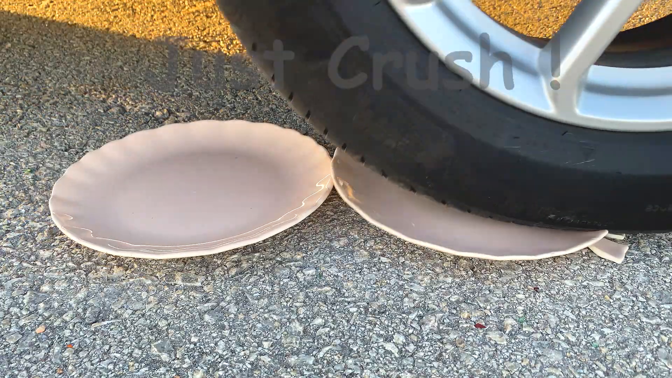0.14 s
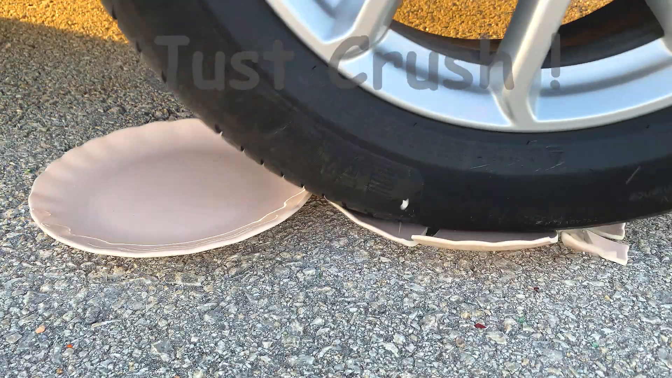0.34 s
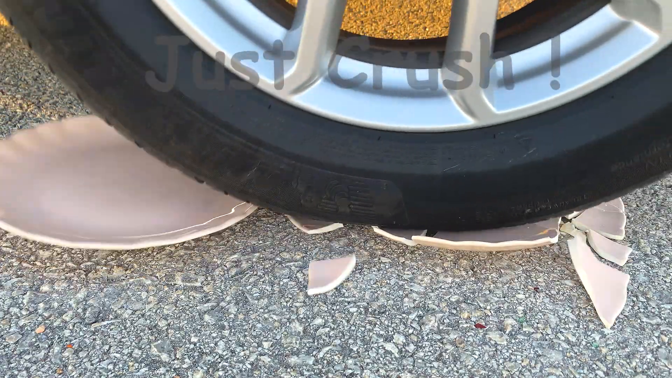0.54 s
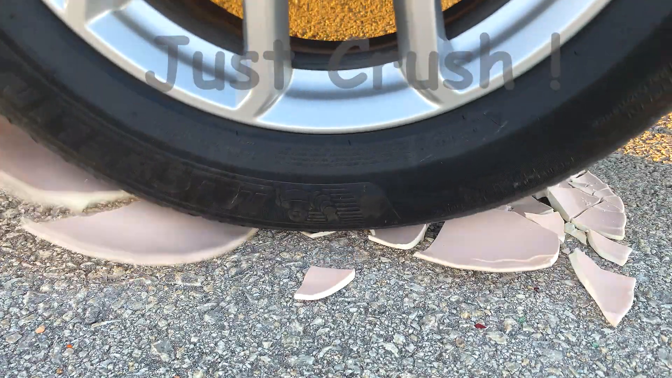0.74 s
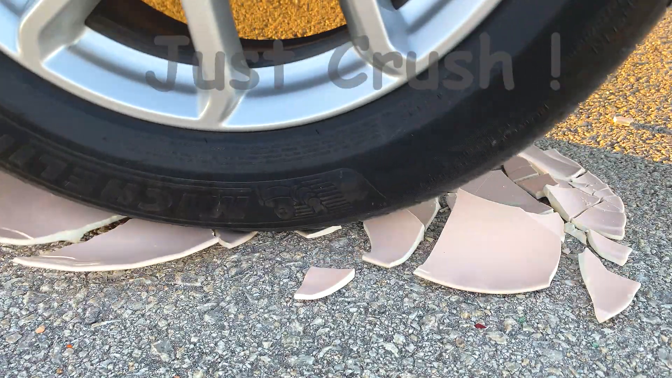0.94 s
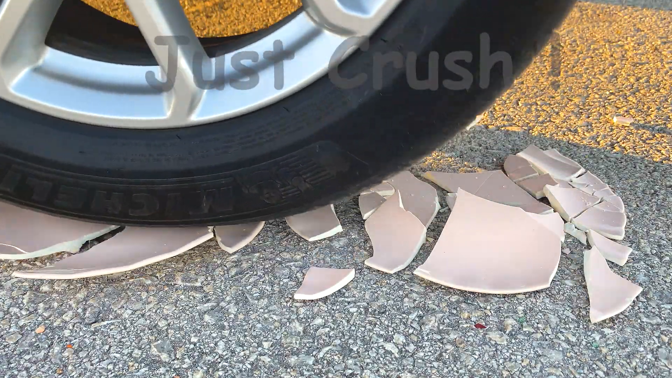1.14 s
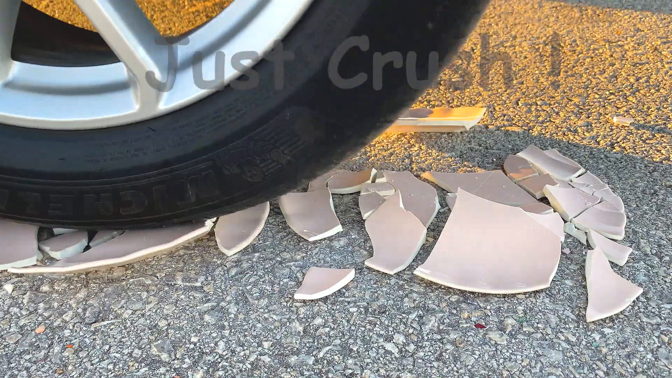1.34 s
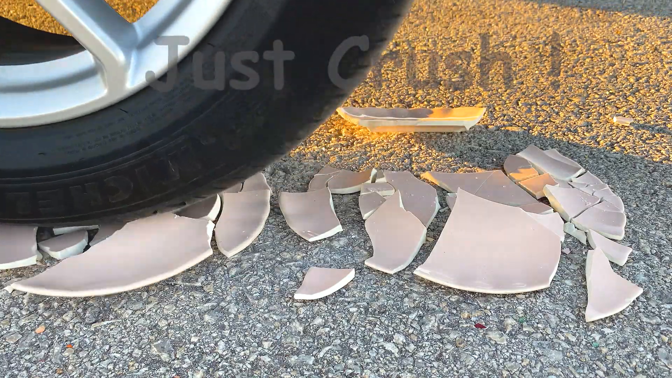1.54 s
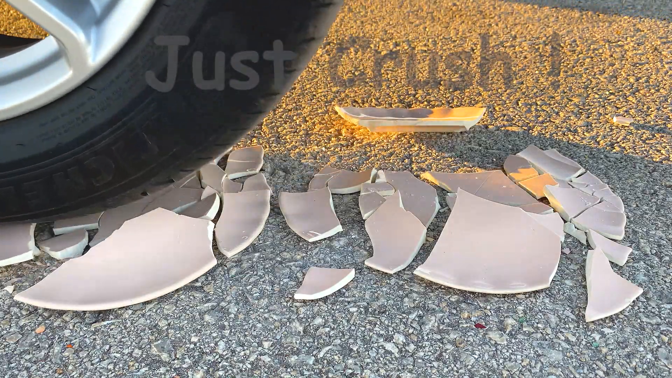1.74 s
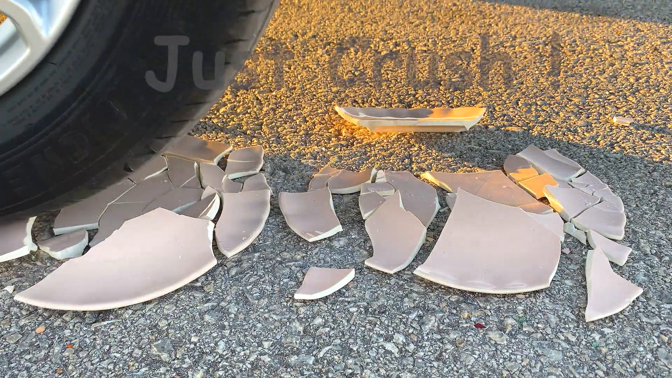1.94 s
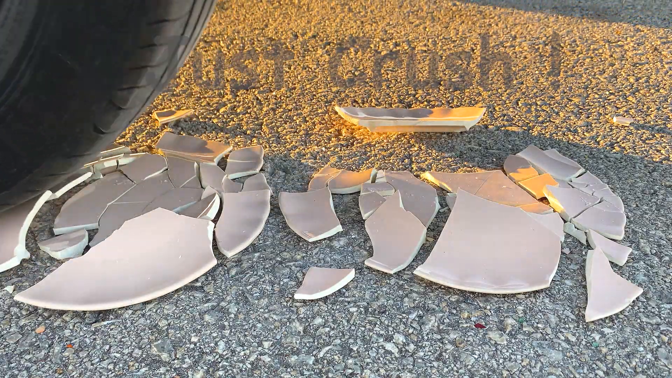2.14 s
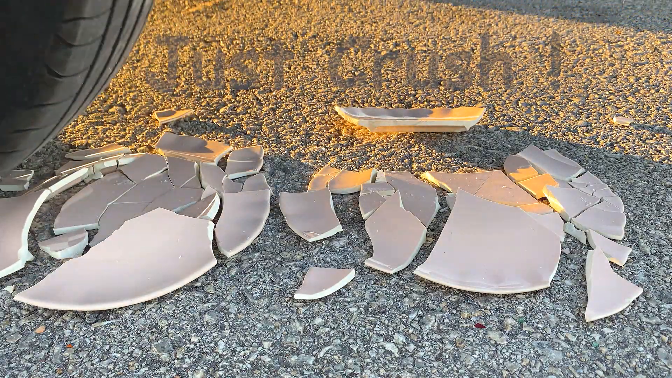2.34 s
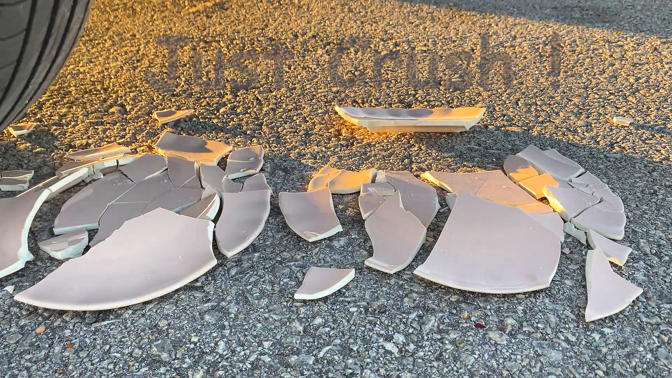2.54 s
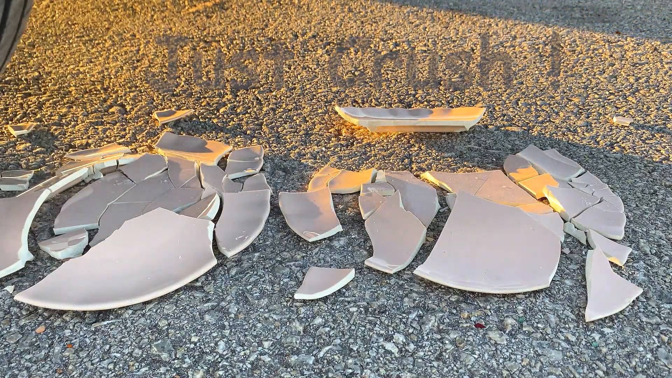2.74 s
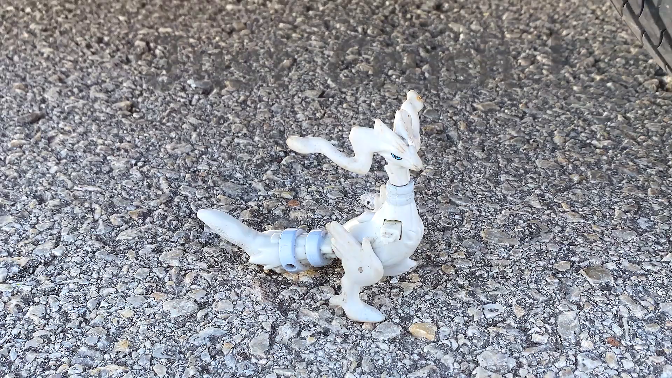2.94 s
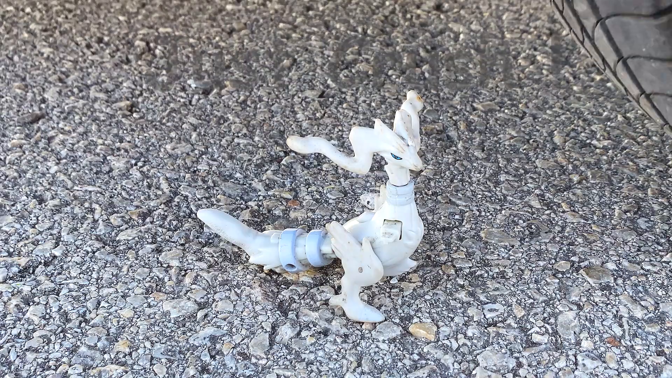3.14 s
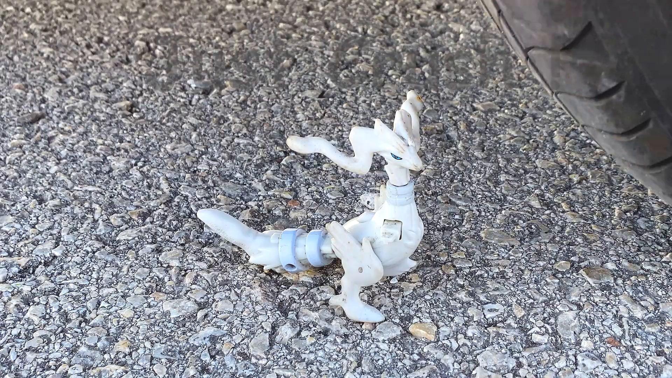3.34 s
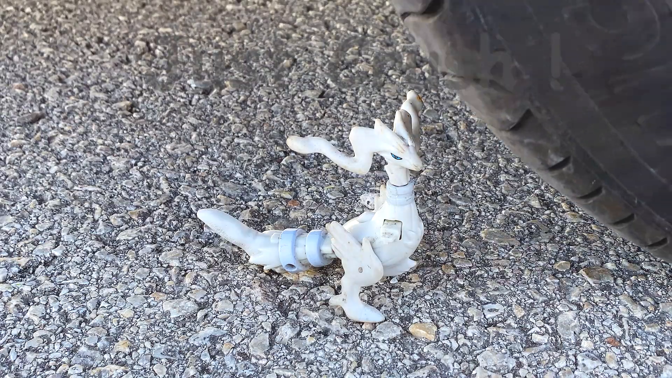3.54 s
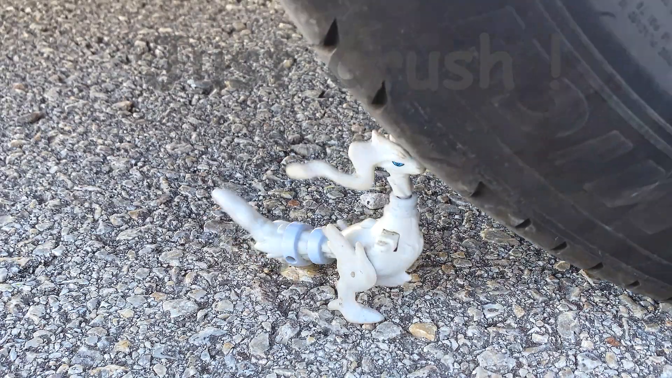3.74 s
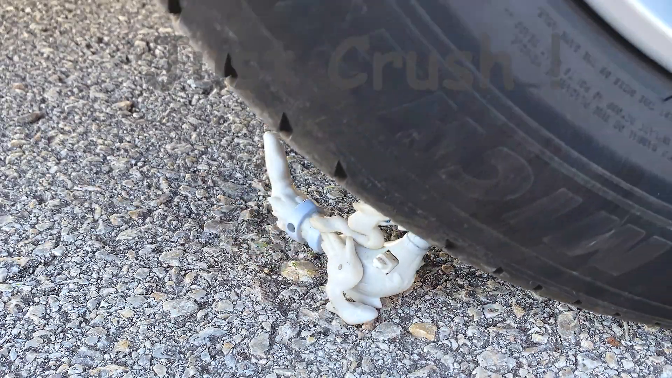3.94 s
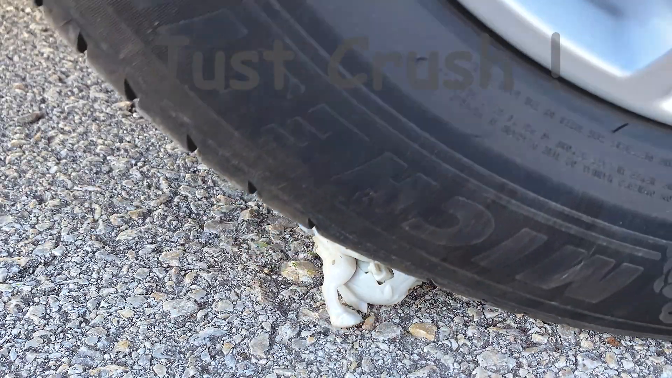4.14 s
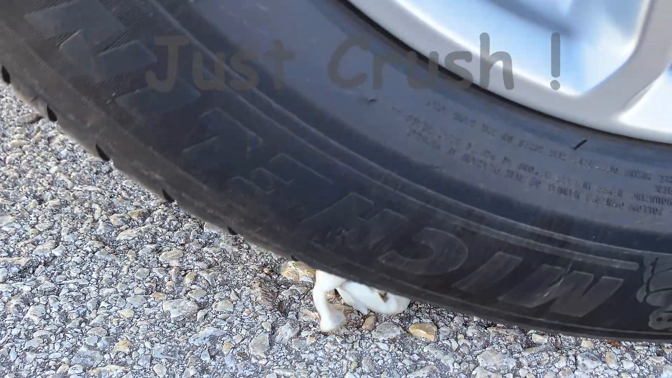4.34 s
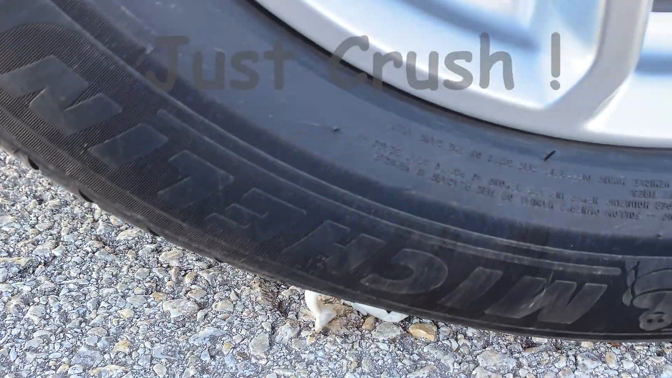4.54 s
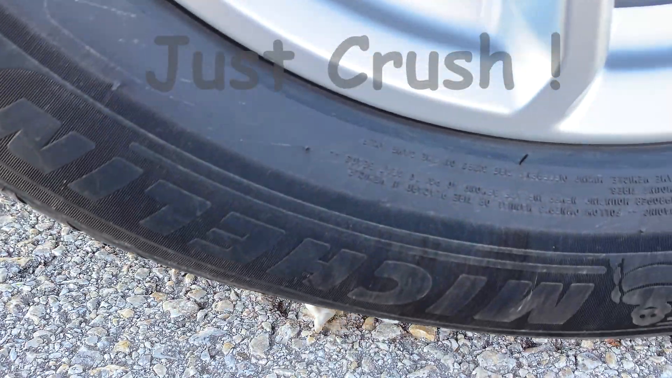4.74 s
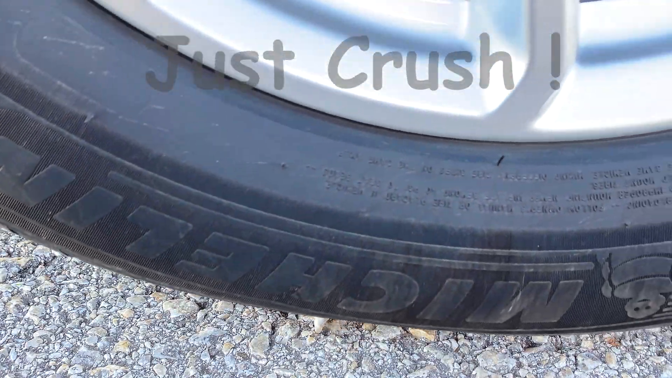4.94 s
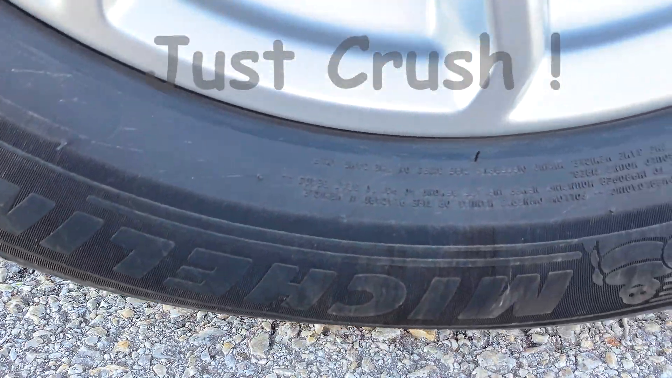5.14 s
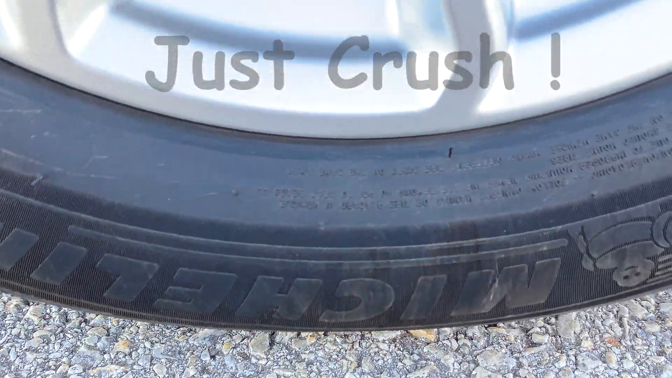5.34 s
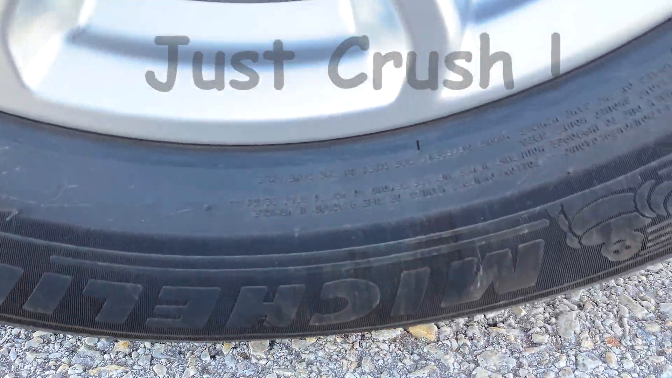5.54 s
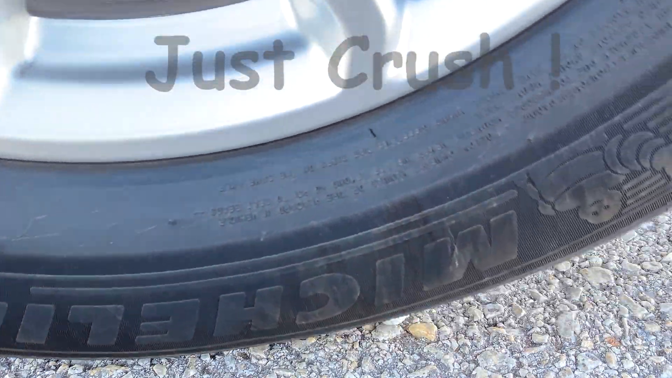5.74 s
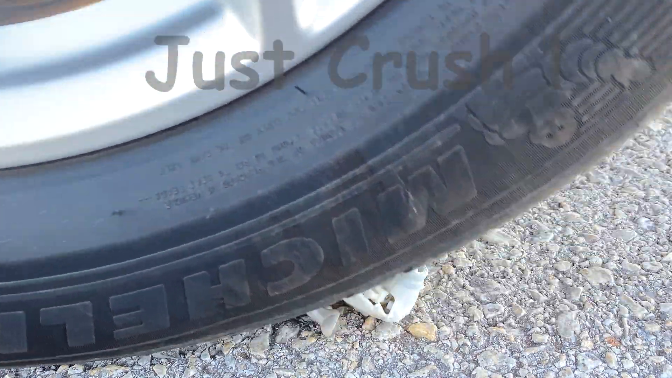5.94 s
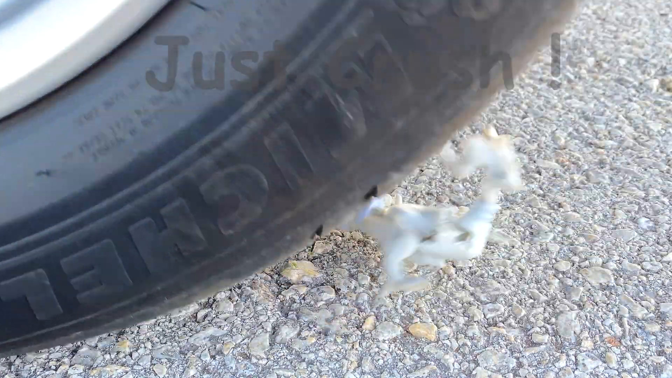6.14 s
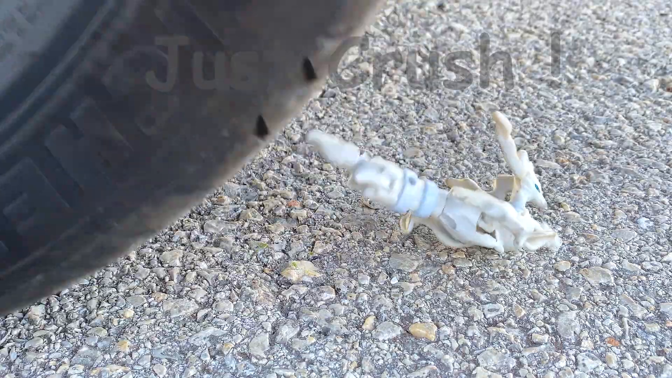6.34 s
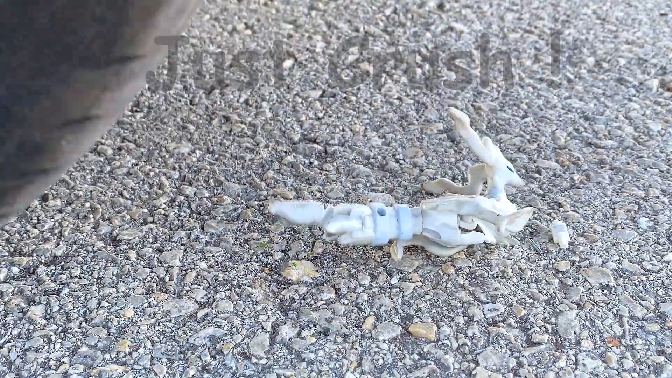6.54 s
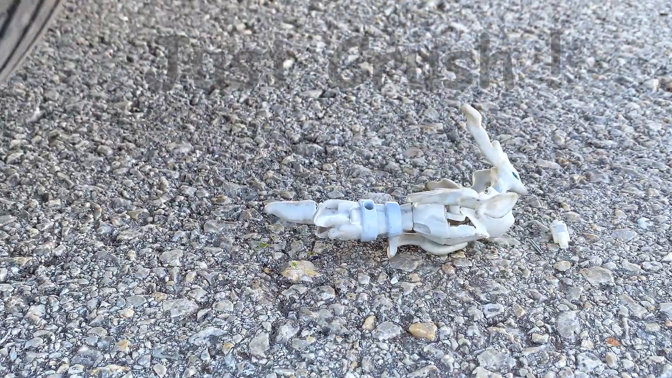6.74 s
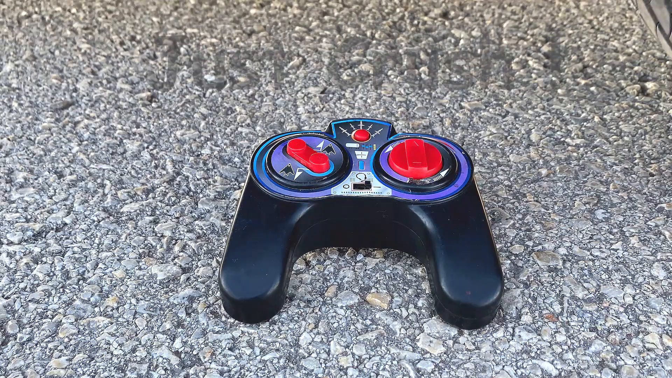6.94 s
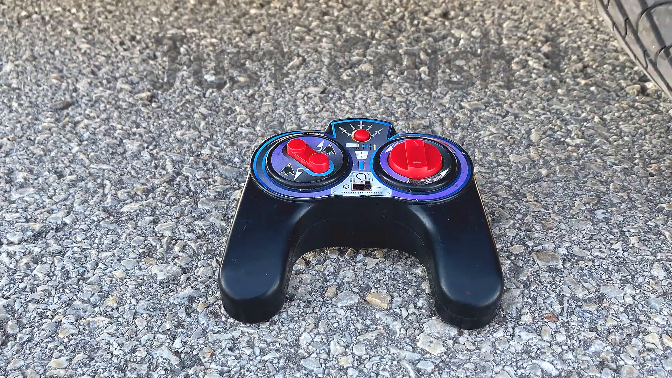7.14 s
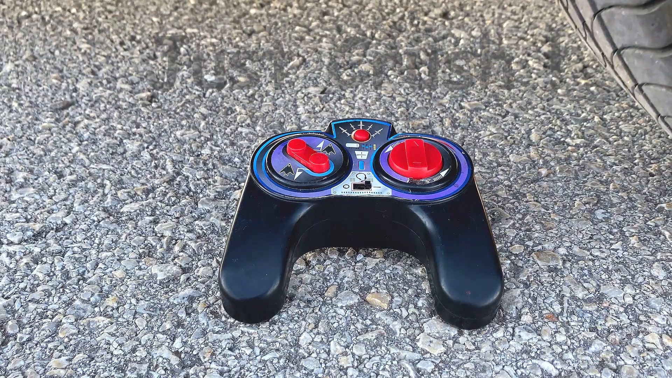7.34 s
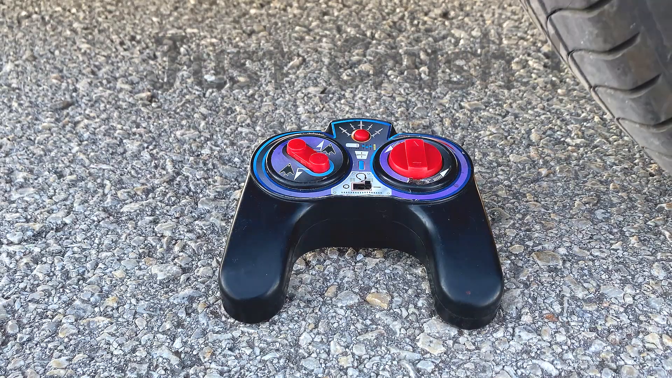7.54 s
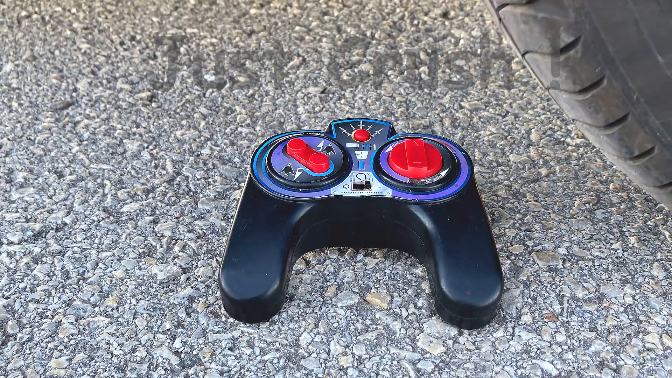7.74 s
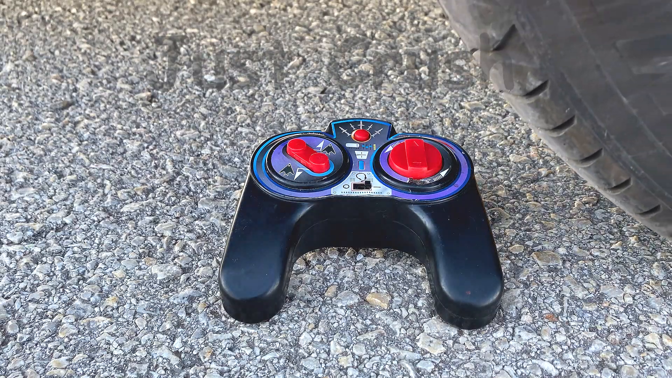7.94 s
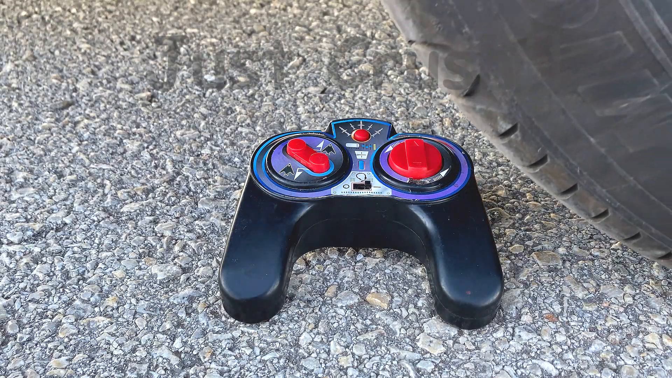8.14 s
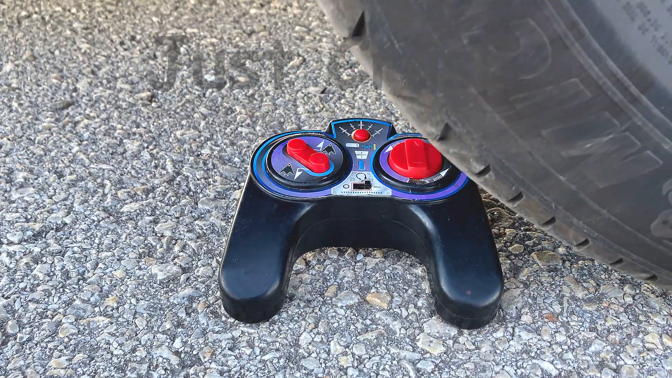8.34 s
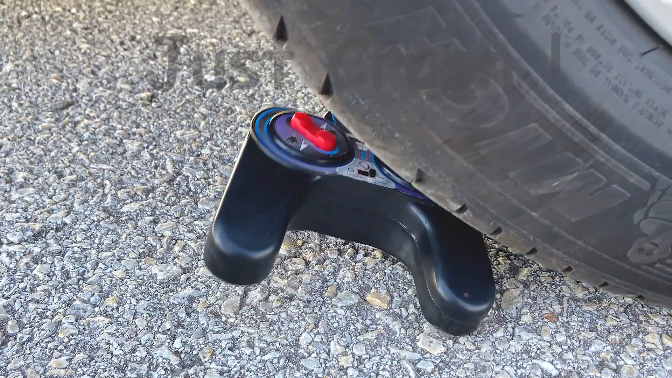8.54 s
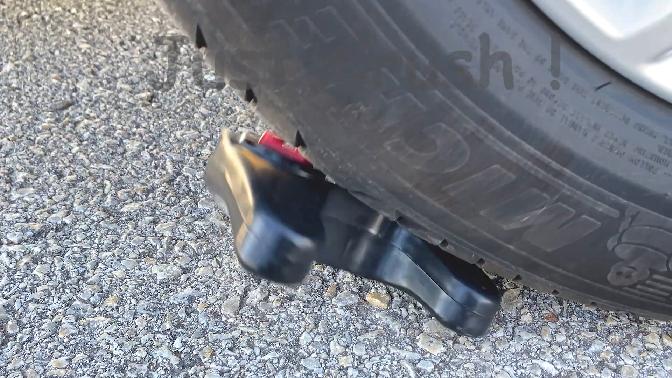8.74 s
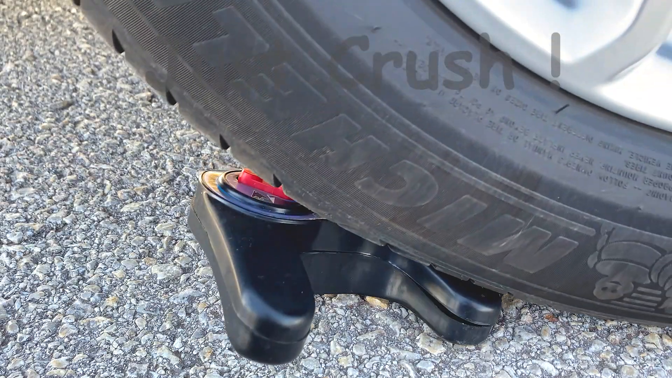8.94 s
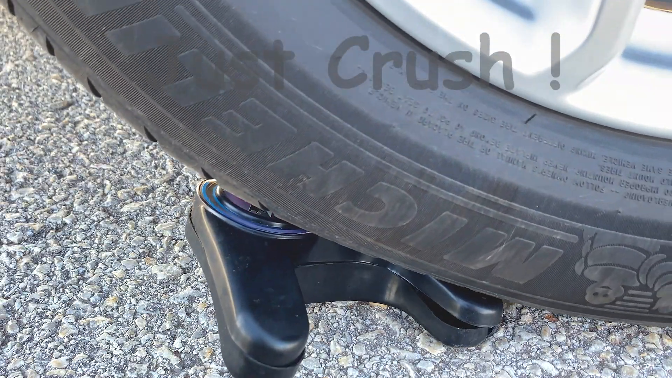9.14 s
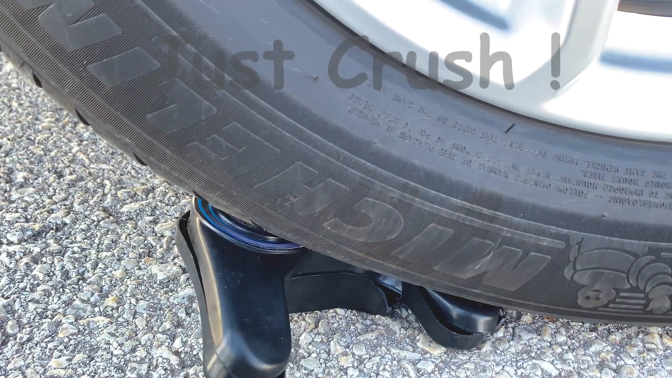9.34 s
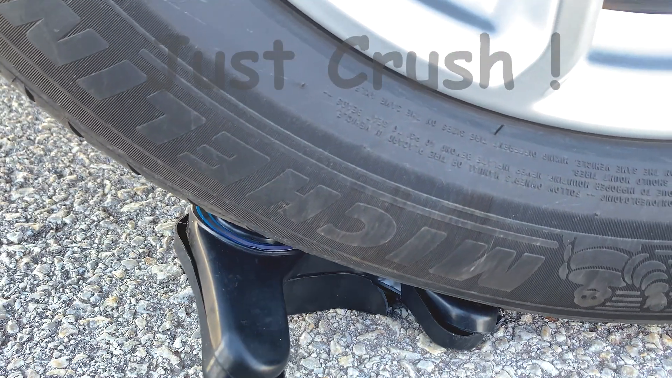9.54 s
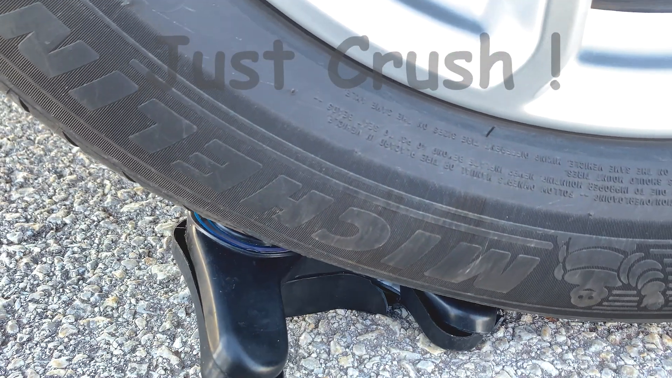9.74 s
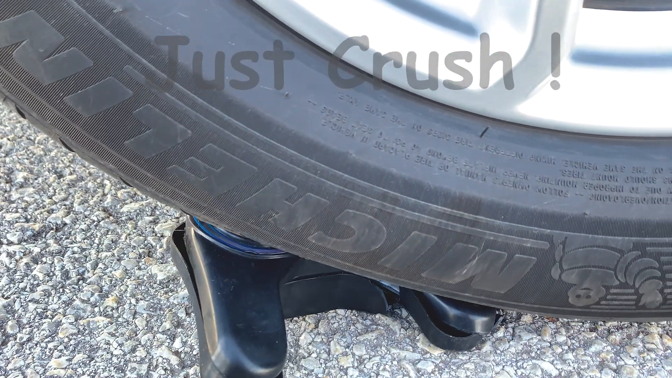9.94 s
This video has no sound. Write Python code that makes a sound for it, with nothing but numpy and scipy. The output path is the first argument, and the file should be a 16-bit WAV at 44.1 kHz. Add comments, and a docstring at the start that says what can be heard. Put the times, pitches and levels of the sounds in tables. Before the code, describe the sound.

Close to a tyre on asphalt, an idling car rolls over china plates, which burst in sharp, loud cracks with ringing shards and a bouncing sliver. After a quieter gap, a small plastic figure snaps drily. Later a hollow plastic controller scrapes on the road and breaks in harder cracks. Low wind rumbles on the close stereo microphone.

```python
"""On an asphalt road, close to a tyre: an idling car creeps over china, a plastic figure and a hollow remote control.
China bursts in runs of filtered-noise cracks, and its shards ring on in their own decaying modes.
Plastic snaps in shorter, drier cracks and scrapes as dense grains; crumbs tick under the tread.
The engine is a stack of firing orders with ticking bay hiss and a whine; a light breeze rumbles on the microphone.
Echoes from under the car thicken the breaking, and a fast limiter flattens the loudest bursts."""
import sys
import numpy as np
from scipy import signal
from scipy.io import wavfile
from scipy.ndimage import uniform_filter1d, minimum_filter1d

SR = 44100
rng = np.random.default_rng(int(sys.argv[2]) if len(sys.argv) > 2 else 0)


def wav_out(sig):
    """Save sig, one row per channel (or a flat mono array), as 16-bit PCM at SR to the path in sys.argv[1]."""
    wavfile.write(sys.argv[1], SR, np.round(np.clip(np.atleast_2d(sig).T, -1, 1) * 32767).astype(np.int16))


N = 440559
TIME = np.arange(N) / SR

# One row per drive over an object: start_s, wheel_on_top_s, climb_extra_firings_per_s, calm_air_db
PASSES = [(0, 0.748, 0, -63), (2.87, 5.198, 3.5, -57), (6.867, 10.151, 3, -47)]
# Engine orders 1, 2, 3, .. of the firing rate, before lift and waver: level_db (rms)
ENGINE_ORDERS = [-65, -62.5, -66, -62.5, -63.5, -69, -66.5, -65.5, -76.5, -73.5, -62, -61.5, -62.5, -68.5,
                 -72, -67.5, -68]
# Exhaust resonances that lift an order passing through: centre_hz, half_width_hz, lift_db
EXHAUST_RESONANCES = [(85, 5, 9), (158, 10, 11), (403, 14, 7)]
# Spectrum of the engine bay noise: frequency_hz, density_db (per Hz)
BAY_SPECTRUM = [(25, -12), (110, -18.5), (200, -6), (270, -10.5), (350, 3), (430, -8), (540, -9),
                (660, -0.5), (800, -7.5), (1050, -10), (1600, -15.5), (3600, -19.5), (4800, -28.5),
                (16000, -40.5)]
# Gusts on the microphone: peak_s, level_db
GUSTS = [(2.98, -42.5), (5.85, -43), (6.35, -41), (7.15, -36), (7.6, -42.5), (8.6, -40), (9.4, -38)]
# China cracking apart: start_s, snap_db (rms over 10 ms), crumble_s, knock_db (relative to the snap)
CHINA_BURSTS = [(.001, -8, 0.055, -6.5), (0.0575, -10.5, 0.065, -3), (0.2212, -6.5, 0.02, 2),
                (0.2814, -12.5, 0.0024, -10.5), (0.3008, -13, 0.025, -4.5), (.394, -2, 0.057, -6.5),
                (.4599, -12.5, 0.0058, -11), (.5038, -5, 0.014, -5), (.566, -23, 0.0017, -9),
                (0.8268, -18, 0.0025, -2), (0.8417, -7.5, 0.043, -4.5), (.9138, -8, .033, -7.5),
                (1.1215, -8, 0.017, 2), (1.1569, -17, 0.0048, -2), (1.1749, -15, 0.0048, 1),
                (1.19, -21, .004, 1.5), (1.2092, -12, 0.009, -3.5), (1.238, -20.5, .003, -0.5),
                (1.31, -21, 0.0023, -9), (1.327, -8.5, .02, -12.5), (1.3575, -15.5, .006, -7),
                (1.3848, -11, 0.013, -8.5), (1.424, -9.5, .033, -10), (1.472, -4, 0.014, -9),
                (1.5775, -26.5, 0.0022, -10.5), (2.1059, -44, 0.00041, 4.5), (2.143, -44.5, .001, -5),
                (2.4328, -39.5, .002, -15)]
# Large pieces of plate slapped flat on the road: start_s, knock_db
PLATE_SLAPS = [(0.351, -25.5), (0.5526, -13), (.6205, -18), (0.6408, -30.5), (0.7306, -17), (0.7545, -23.5),
               (0.7822, -26), (1.0695, -25.5), (1.273, -23.5), (1.745, -21.5), (1.9275, -11.5),
               (2.0201, -43.5), (2.0782, -47)]
# Spectrum of a china crack, before its tilt: frequency_hz, density_db (per Hz)
CHINA_SPECTRUM = [(60, -12.5), (150, -1.5), (400, -6.5), (650, -8.5), (900, -1), (1500, -9.5), (2800, -7.5),
                  (4500, -11), (8000, -15), (16000, -28)]
# Ringing modes of each named piece of china: mode_hz, level_db, t60_s
SHARD_MODES = { "plate": [(689, -12, .7), (930, -6, .3), (1348, -9, .6), (1464, 0, .8), (1695, -4, .25),
               (1815, -7, .25), (2272, -2, .8), (3630, -12, .6)], "half": [(2277, -4, .3), (4651, 0, .45),
               (4969, -7, .25), (8263, -8, .5), (11130, -3, .3), (15560, -16, .3)],
               "wedge": [(2686, -12, .35), (3460, 0, .35), (4538, -5, .1), (7644, -2, .08),
               (10470, -15, .12)], "rim": [(2789, -2, .12), (2917, -2, .15), (3159, -3, .15), (7396, 0, .2),
               (14380, -10, .12)], "sliver": [(5362, 0, .35), (5599, -14, .25), (7397, -20, .3),
               (9782, -4, .3), (13453, -24, .4)], "flake": [(5420, 0, .14), (9800, -13, .12)],
               "strip": [(2573, 0, .25), (5400, -4, .1)], "chip": [(3591, -5, .15), (5410, 0, .16),
               (6099, -2, .12), (9566, -9, .15), (14896, -12, .1)]}
# Each named piece springing free or touching down: start_s, level_db
SHARD_TOUCHES = { "plate": [(.002, -28), (.06, -20), (.222, -30), (.301, -24), (.394, -18)],
                 "half": [(.46, -29), (.504, -19), (.566, -22.5), (.6045, -26.5), (.731, -33.5)],
                 "wedge": [(.914, -19), (.943, -20), (1.3264, -27)], "rim": [(1.2085, -29), (1.3843, -16.5),
                 (1.428, -22.5), (1.472, -23.5)], "sliver": [(1.445, -19)], "flake": [(2.4887, -44),
                 (2.58, -34)], "chip": [(2.175, -51), (2.2378, -47.5), (2.431, -32)],
                 "strip": [(2.2932, -41.5), (2.361, -49)]}
# Plastic snapping: start_s, snap_db, knock_db (relative to the snap)
PLASTIC_SNAPS = [(4.072, -34, -8), (4.1336, -44, -15), (4.2549, -21, -6), (4.343, -29.5, -16),
                 (4.3505, -23.5, -11.5), (4.3934, -23, -5.5), (4.403, -30.5, -3), (4.4232, -26, -11),
                 (4.4317, -20, -9), (4.4591, -28, 3.5), (4.4833, -31, -5), (4.5082, -33.5, -32),
                 (4.5634, -44, -16), (4.6095, -32, -12), (4.6353, -35, -22), (4.6953, -35.5, -17),
                 (4.7599, -34, -16), (4.8999, -18, -5), (5.1611, -26.5, -4.5), (8.8302, -28, 1),
                 (9.0069, -36, -3.5), (9.0405, -17, -1.5), (9.08, -22, -13.5), (9.1212, -41, -6),
                 (9.1576, -29.5, -7.5), (9.3403, -26.5, -16), (9.375, -14, -5.5), (9.3957, -11.5, -3.5),
                 (9.4617, -31.5, -3), (9.577, -48, -1.5), (9.6644, -20, -3.5), (9.8054, -29, -1),
                 (9.9522, -29.5, -7)]
# The tyre dropping with a dull thud: start_s, thump_db
TYRE_THUDS = [(4.448, -25), (7.41, -38), (9.416, -22.5), (9.458, -35)]
# Spectrum of a plastic crack, before its tilt: frequency_hz, density_db (per Hz)
PLASTIC_SPECTRUM = [(60, 0.5), (150, 0.5), (400, -3), (600, -3.5), (1050, -0.5), (1800, -7), (3500, -7),
                    (6500, -6), (10000, -12), (16000, -14.5)]
# The flattened figure peeling out of the tread: peak_s, level_db
FIGURE_PEELS = [(6.23, -56.5), (6.35, -64.5)]
# The plastic shell shoved along the asphalt: peak_s, level_db
SHELL_SHOVES = [(8.545, -42), (8.61, -47), (8.7, -37.5), (8.82, -38.5), (8.87, -32.5), (8.92, -36.5)]

IDLE_HZ = 28.2  # firings per second
# The throttle opens slowly for the climb and closes fast; the engine then sags below idle
OPENING_S, CLOSING_S = .68, .44
SAG_SHARE, SAG_AFTER_TOP_S, SAG_HALF_S = .28, .75, .3  # depth is a share of the climb
# Treble of the engine bay: gain while it faces the microphone, loss once the wheel has gone by
FACING_DB, RECEDE_DB_PER_S = 5.5, 5.5
# The sliver lands and bounces, each hop a little shorter and weaker than the last
LANDING_S, LANDING_DB = 1.488, -9.5
FIRST_HOP_S, HOP_RATIO, HOP_LOSS_DB = .058, 0.98, 5.5
# A harder snap runs on for longer: length at 0 dB, then dB of length per dB of strength
SNAP_RUN_S, SNAP_RUN_SLOPE = 0.13, 1.523
# Every burst, slap and snap leaves crumbs under the tread (level relative to the break), which settle
CHINA_CRUMBS_DB, PLASTIC_CRUMBS_DB, SETTLE_DB_PER_S = -26, -37.5, 55.5
BAND_LIMIT_HZ = 16100


def amp(db):
    """Decibels to gain."""
    return 10 ** (np.asarray(db) / 20)


def evened(x):
    """Scales to rms 1."""
    return x / np.sqrt(np.mean(x ** 2) + 1e-20)


def add(mix, s, sound):
    """Mixes a stereo sound in at time s."""
    part = mix[:, max(round(s * SR), 0):][:, :sound.shape[1]]
    part += sound[:, :part.shape[1]]


def band(x, hz, kind, order=3):
    """Butterworth filter."""
    return signal.sosfilt(signal.butter(order, hz, kind, fs=SR, output="sos"), x)


def colour(x, points, size=2048):
    """Shapes a stereo sound to a spectrum with a causal, minimum-phase filter."""
    f, db = np.transpose(points)
    bin_hz = abs(np.fft.fftfreq(size, 1 / SR)) + 1
    log_gain = np.log(amp(np.interp(np.log(bin_hz), np.log(f), db)))
    response = np.exp(np.conj(signal.hilbert(log_gain)))
    taps = np.fft.ifft(response).real[:size // 2]
    return signal.fftconvolve(x, taps[None], axes=1)[:, :x.shape[1]]


def pair(size, side_db):
    """Stereo noise: a shared part and an opposed part at side_db relative to it."""
    mid, side = rng.standard_normal((2, size))
    return evened(np.array([mid + amp(side_db) * side, mid - amp(side_db) * side]))


def drift(hz):
    """Random wander of rms 1 with hz new values a second."""
    knots = rng.standard_normal(1024)
    return evened(np.interp(TIME * hz, np.arange(len(knots)), knots))


def swells(rows, rise_db_per_s, fall_db_per_s):
    """Level in dB at every sample: it climbs to each peak and falls away after it."""
    t = TIME[::64]
    peaks = [db - np.maximum((s - t) * rise_db_per_s, (t - s) * fall_db_per_s) for s, db in rows]
    return np.interp(TIME, t, np.max(peaks, 0))


def passing():
    """At every sample: time since the wheel topped the object, size of the climb, level of the calm air."""
    start, top, climb, calm_db = np.transpose(PASSES)
    now = np.searchsorted(start, TIME, "right") - 1
    return TIME - top[now], climb[now], calm_db[now]


def firing_rate():
    """Idle, with a push of throttle up each object and a sag after it."""
    since, climb, _ = passing()
    throttle = np.exp(-(since / np.where(since < 0, OPENING_S, CLOSING_S)) ** 2)
    sag = SAG_SHARE * np.exp(-((since - SAG_AFTER_TOP_S) / SAG_HALF_S) ** 2)
    return IDLE_HZ + climb * (throttle - sag)


def engine(waver_db=3.0, bay_db=-52, whine_db=-71, cylinders_db=(0, 1, 0, -5)):
    """Orders of the firing rate, a thin belt-driven whine, and a bay hiss that ticks with every firing."""
    firing = firing_rate() * (1 + .004 * drift(12))
    turns = np.cumsum(firing) / SR  # firings so far
    hum = np.zeros((2, N))
    for k, db in enumerate(ENGINE_ORDERS, 1):
        lift_db = sum(peak_db * np.exp(-((k * firing - hz) / width) ** 2)
                      for hz, width, peak_db in EXHAUST_RESONANCES)
        ear_phase = .3 * rng.standard_normal((2, 1))
        phase = 2 * np.pi * (k * turns + rng.random()) + ear_phase
        hum += np.sqrt(2) * amp(db + lift_db + waver_db * drift(8.2)) * np.sin(phase)
    whine = amp(whine_db) * np.sqrt(2) * np.sin(2 * np.pi * 38.7 * turns)

    # Four cylinders tick in turn, at unequal strengths
    cylinder = np.round(turns).astype(int) % len(cylinders_db)
    ticks = evened(1 + 1.3 * amp(cylinders_db)[cylinder] * np.cos(np.pi * turns) ** 8)
    bay = amp(bay_db) * evened(colour(pair(N, -3.5), BAY_SPECTRUM))
    low, high = band(bay, 770, "lowpass"), band(bay, 1300, "highpass")
    since, _, _ = passing()
    treble_gain = amp(FACING_DB - RECEDE_DB_PER_S * np.maximum(since, 0))
    return hum + low + (high * ticks + whine) * treble_gain


def breeze(gust_db=3):
    """Lumpy rumble, largely different at the two ports; gusts come quickly and die down to the calm."""
    air = [(10, -20), (35, -1.0), (80, -1), (130, -10), (250, -21), (1000, -66.5)]  # Hz, dB per Hz
    rumble = colour(pair(N, 0.075), air)
    _, _, calm_db = passing()
    wind_db = np.maximum(swells(GUSTS, rise_db_per_s=80, fall_db_per_s=21), calm_db)
    port_db = np.array([[-2], [0]])
    return evened(rumble) * amp(wind_db + gust_db * drift(26) + port_db)


def fracture(t, crumble_s, slips_per_s=900, later_db=-8):
    """One break, then a run of lesser ones as the crack spreads and dies."""
    sizes = rng.choice([-1, 1], len(t)) * (.5 + rng.random(len(t)))
    fade = np.clip(2 * (1 - t / (crumble_s + 1e-6)), 0, 1)
    slips = amp(later_db) * sizes * fade * (rng.random(len(t)) < slips_per_s / SR)
    slips[0] = 1
    return slips


def splinters(t, t60, count=14):
    """The few random modes of a freshly broken piece; the high ones die sooner."""
    place, size, start, turn = rng.random((4, count, 1))
    hz = 1500 * 9 ** place
    modes = size * amp(-60 * t / t60 * np.sqrt(hz / 4000))
    return np.array([(modes * np.sin(2 * np.pi * (hz * t + start) + ear * (turn - .5))).sum(0)
                     for ear in (-1, 1)])


def cracks(rows, spectrum, snap_t60, knock_t60, thump_t60, ring_t60, ring_db, spike_db, side_db, size=8192):
    """Fractures shake the splinters (snap), the whole object (knock) and the tyre that drops on it (thump)."""
    t, out = np.arange(size) / SR, np.zeros((2, N))
    spike = amp(spike_db) * np.exp(-t / 0.0004)  # the release of stress itself
    for s, snap_db, knock_db, thump_db, crumble_s in rows:
        slips = fracture(t, crumble_s)
        # Per octave above 2200 Hz: small pieces knock little and sound bright
        tilt_db = np.clip(.25 * (snap_db - knock_db - 3), -2, 3)
        timbre = [(hz, db + tilt_db * np.log2(max(hz / 2200, 1))) for hz, db in spectrum]

        shed = min(crumble_s / 0.0048, 1)  # a short crumbling sheds less splinter ring
        snap = evened(pair(size, side_db) * (amp(-60 * t / snap_t60) + spike))
        snap = snap + shed * amp(ring_db) * evened(splinters(t, ring_t60))
        knock = pair(size, -18.0) * amp(-60 * t / knock_t60)
        thump = pair(size, -7) * amp(-60 * t / thump_t60)
        parts = [(snap_db, band(colour(snap, timbre), 2200, "highpass")),
                 (knock_db, band(colour(knock, timbre), [480, 2200], "bandpass")),
                 (thump_db, band(colour(thump, timbre), [80, 480], "bandpass"))]
        for db, ring in parts:
            sound = signal.fftconvolve(ring, slips[None], axes=1)[:, :size]
            # The level sets the energy, counted as rms over 10 ms
            add(out, s, amp(db) * evened(sound) * np.sqrt(SR / 100 / size))
    return out


def china_breaks(burst_thump_db=-17, slap_snap_db=-7, slap_thump_db=-13, slap_s=.0015):
    """Bursts are bright and crumble on, slaps short and dull: start_s, snap_db, knock_db, thump_db, crumble_s."""
    bursts = [(s, db, db + knock_db, db + burst_thump_db, crumble_s)
              for s, db, crumble_s, knock_db in CHINA_BURSTS]
    slaps = [(s, db + slap_snap_db, db, db + slap_thump_db, slap_s) for s, db in PLATE_SLAPS]
    return bursts + slaps


def breaking_china():
    """Brittle plates crack with a sharp spike and a strong ring of splinters."""
    return cracks(china_breaks(), CHINA_SPECTRUM, snap_t60=.017, knock_t60=0.029, thump_t60=0.11,
                  ring_t60=0.046, ring_db=-2, spike_db=2.5, side_db=-9.5)


def bounces(count=9):
    """Touches of the bouncing sliver: start_s, level_db."""
    hops = FIRST_HOP_S * HOP_RATIO ** np.arange(count)
    return [(LANDING_S + hops[:k].sum(), LANDING_DB - HOP_LOSS_DB * k) for k in range(count)]


def clinks(uneven_db=2, pan_db=-1.5, port_turn=.55):
    """Shards ring in their own modes, a little differently at each touch; the next touch stops the old ring."""
    out = np.zeros((2, N))
    t = np.arange(SR // 2) / SR
    for name, touches in SHARD_TOUCHES.items():
        touches = touches + (bounces() if name == "sliver" else [])
        hz, mode_db, t60 = np.transpose(SHARD_MODES[name])[:, :, None]
        next_times = [s for s, db in touches[1:]] + [N / SR]
        for (s, db), until in zip(touches, next_times):
            size, pan, turn, start = rng.standard_normal((4, len(hz), 1))
            # The piece rocks against the stones, which shakes the strength and phase of each mode
            rocking = rng.standard_normal((2, len(hz), len(t)))
            rock, shake = evened(uniform_filter1d(rocking, size=330))
            held = np.exp(-np.maximum(t - (until - s), 0) / 0.032) * (1 - np.exp(-t / .001))
            modes = amp(db + mode_db + uneven_db * size - 60 * t / t60) * held * (1 + .3 * rock)
            phase = 2 * np.pi * (hz * t + start) + .35 * shake
            ears = [modes * amp(ear * pan_db * pan) * np.sin(phase + ear * port_turn * turn) for ear in (-1, 1)]
            add(out, s, np.array(ears).sum(1))
    return out


def grains(per_s, spread_db, t60, spectrum, side_db, count=12, size=1024):
    """Tiny ticks of very unequal size, from a dozen different contacts."""
    t, out = np.arange(size) / SR, np.zeros((2, N))
    strength = amp(spread_db * np.minimum(rng.exponential(1, N), 3))
    ticks = strength * (rng.random(N) < per_s / SR)
    contact = rng.integers(0, count, N)
    shapes = [pair(size, side_db) * amp(-60 * t / t60) for _ in range(count)]
    for at in np.flatnonzero(ticks):
        add(out, at / SR, ticks[at] * shapes[contact[at]])
    return evened(colour(out, spectrum))


def grit(rolling_db=-73):
    """Crumbs and stones pop under the tread, most of all just after something has broken."""
    stones = [(200, -12), (1000, -3), (3500, 0), (8000, -4), (16000, -10)]  # Hz, dB per Hz
    ticks = grains(170, 6.2, .008, stones, -4)
    china_crumbs = [(s, db + CHINA_CRUMBS_DB) for s, db, *_ in china_breaks()]
    plastic_crumbs = [(s, db + PLASTIC_CRUMBS_DB) for s, db, _ in PLASTIC_SNAPS]
    crumb_db = swells(china_crumbs + plastic_crumbs + FIGURE_PEELS,
                      rise_db_per_s=298.5, fall_db_per_s=SETTLE_DB_PER_S)
    return (amp(crumb_db) + amp(rolling_db)) * ticks


def plastic_breaks(snap_thump_db=-15, thud_snap_db=-20, thud_knock_db=-12, thud_s=0.014):
    """Snaps last longer the harder they are; thuds are nearly all tyre. Same columns as the china breaks."""
    snaps = [(s, db, db + knock_db, db + snap_thump_db, SNAP_RUN_S * amp(SNAP_RUN_SLOPE * db))
             for s, db, knock_db in PLASTIC_SNAPS]
    thuds = [(s, db + thud_snap_db, db + thud_knock_db, db, thud_s) for s, db in TYRE_THUDS]
    return snaps + thuds


def snapping_plastic():
    """Plastic cracks drily, with a weak spike and a short, faint ring of splinters."""
    return cracks(plastic_breaks(), PLASTIC_SPECTRUM, snap_t60=.013, knock_t60=.022, thump_t60=.1,
                  ring_t60=0.014, ring_db=-6, spike_db=-7, side_db=-9)


def scrape():
    """The hollow shell catches and slips on the stones."""
    push = amp(swells(SHELL_SHOVES, rise_db_per_s=500, fall_db_per_s=173))
    shell = [(150, -18.0), (400, 2), (750, 7), (1400, -0.5), (2200, 1.0),
             (4500, -10), (9000, -19.5), (16000, -33.5)]  # Hz, dB per Hz
    return push * grains(1200, 3.5, .022, shell, -10.5)


def underbody(x, wet_db=-11, bass_t60=0.15, treble_t60=0.065, far_db=-36, far_t60=0.95):
    """Sound bounces between road, wheel arch and car floor; a faint tail comes from further off."""
    t = np.arange(SR // 2) / SR
    taps = pair(len(t), -2) * (1 - np.exp(-np.maximum(t - .002, 0) / 0.0022))
    near_bass = band(taps, 1500, "lowpass") * amp(-8 - 60 * t / bass_t60)
    near_treble = band(taps, 1500, "highpass") * amp(-60 * t / treble_t60)
    near = near_bass + near_treble
    far = band(taps, 4000, "lowpass", order=1) * amp(-60 * t / far_t60)
    echo = (amp(wet_db) * evened(near) + amp(far_db) * evened(far)) / np.sqrt(len(t))
    return x + signal.fftconvolve(x, echo, axes=1)[:, :N]


def scene():
    """Everything that breaks, over the engine and the breeze."""
    breaking = amp(0.9) * breaking_china() + amp(2.1) * snapping_plastic()
    under_car = underbody(breaking + grit() + scrape())
    return under_car + clinks() + engine() + breeze()


def record(dry):
    """A very fast limiter holds the peaks of both channels together; then the band limit."""
    peak_db = 20 * np.log10(abs(dry).max(0) + 1e-9)
    fall = TIME * 1500  # release in dB per s
    held_db = np.maximum.accumulate(peak_db + fall) - fall
    over_db = np.maximum(held_db + 4.5, 0)  # threshold at -4.5 dB
    limited = dry * amp(uniform_filter1d(minimum_filter1d(-over_db, size=9), size=9))
    low_pass = signal.firwin(301, BAND_LIMIT_HZ, window=("kaiser", 8), fs=SR)
    return signal.oaconvolve(limited, low_pass[None], "same")


dry = scene()
out = record(dry)
wav_out(out)
```